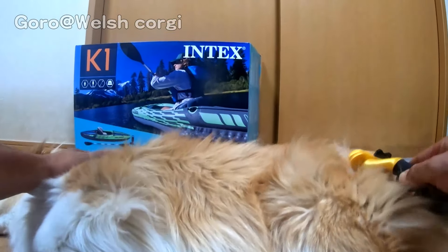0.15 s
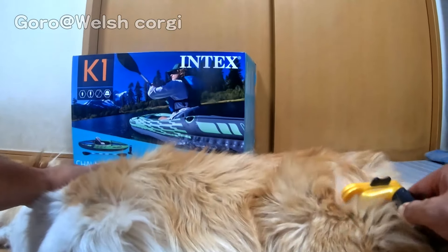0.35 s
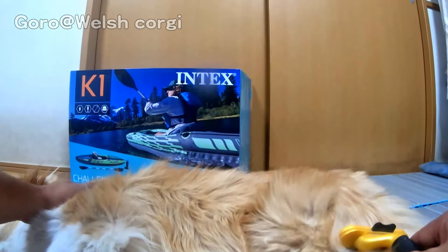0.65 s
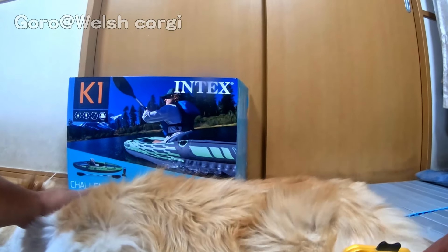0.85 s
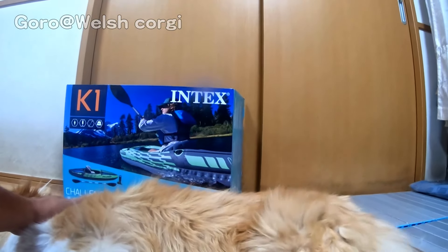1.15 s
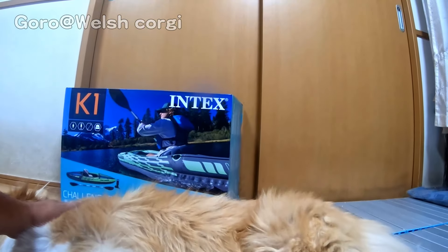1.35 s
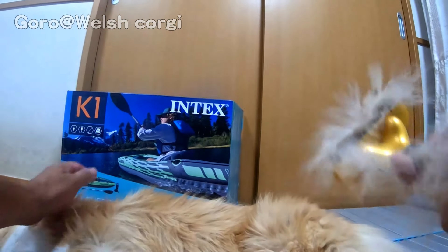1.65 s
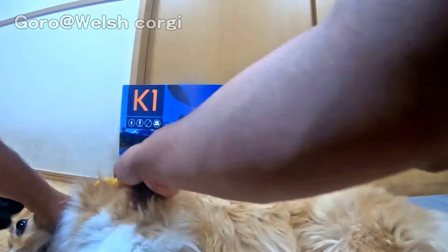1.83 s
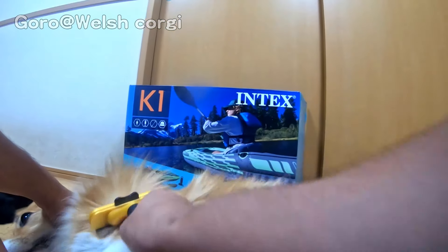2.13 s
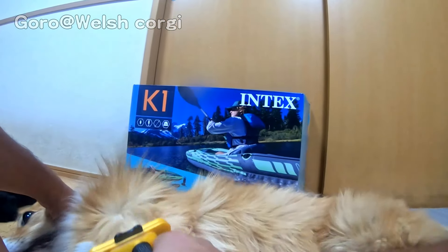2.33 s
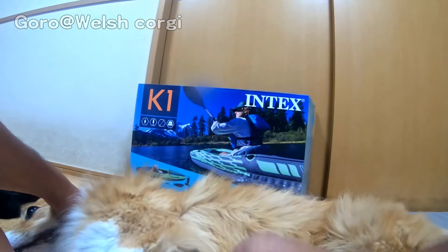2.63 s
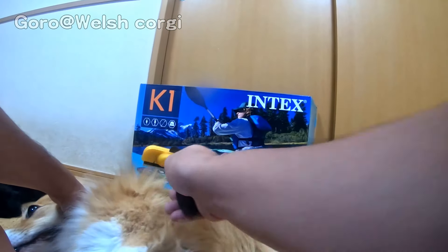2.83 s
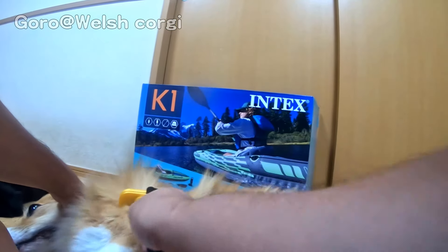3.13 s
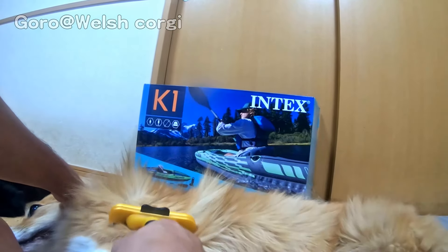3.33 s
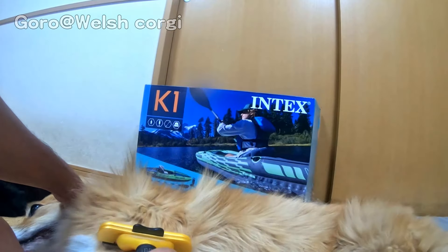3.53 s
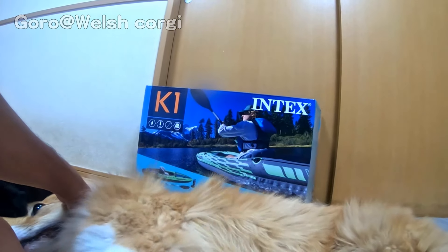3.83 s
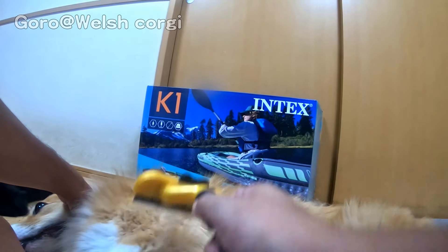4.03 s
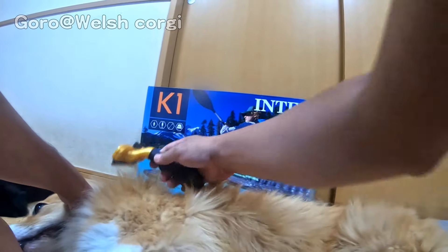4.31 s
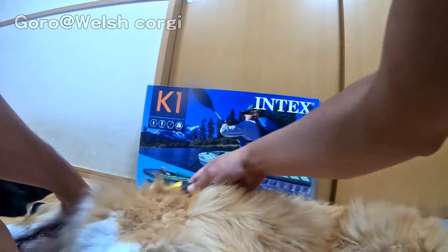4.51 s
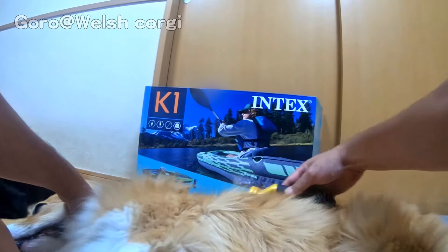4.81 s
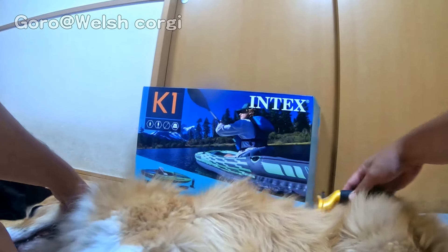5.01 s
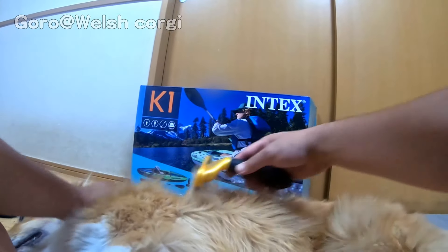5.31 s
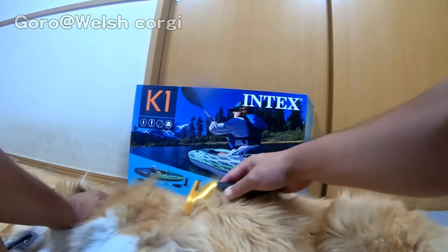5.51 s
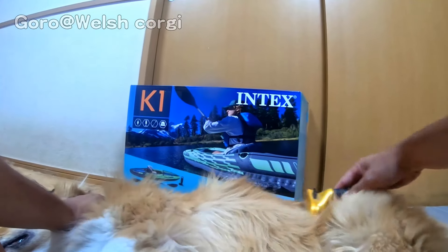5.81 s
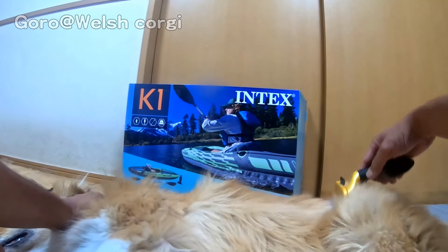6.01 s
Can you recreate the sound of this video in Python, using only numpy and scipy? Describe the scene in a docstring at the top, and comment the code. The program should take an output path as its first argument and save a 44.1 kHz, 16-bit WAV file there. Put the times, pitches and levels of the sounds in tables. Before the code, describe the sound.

In a quiet room, a rake is pulled through a dog's dense fur in short, uneven scratchy strokes. A camera worn by the groomer picks up the handling very closely: dull booms, hollow clacks and soft low thumps. One louder clattering knock comes just before two seconds, then the strokes continue and thin out toward the end over faint hiss.

```python
"""Scratching comes first: a deshedding rake is pulled through a dog's thick coat in a quiet room, close
to a camera worn by the groomer. Stick-slip friction rings short resonances of the camera and its mount.
Knocks boom and clack in the same resonances, snaps ring the housing, and firm rubs add a dull rumble.
Jolts thump the microphone ports as single slow swings; band-passed noise makes the faint swish of fur.
Behind lie shaped noise and a trace of mains hum."""
import sys
import numpy as np
from scipy import signal
from scipy.fft import rfft, irfft
from scipy.io import wavfile
from scipy.ndimage import uniform_filter1d

SR = 44100
rng = np.random.default_rng(int(sys.argv[2]) if len(sys.argv) > 2 else 0)


def output_pcm(signal):
    """Save a mono or channel-first signal as 16-bit PCM at the path in sys.argv[1].

    Samples are clipped to [-1, 1] before scaling.
    """
    pcm = np.clip(np.atleast_2d(signal).T, -1, 1) * 32767
    wavfile.write(sys.argv[1], SR, np.round(pcm).astype(np.int16))


N = 271596
TIME_S = np.arange(N) / SR
TOP_HZ = 11950

# Table levels are before the trims (*_trim_db) in the functions.
# Quiet background: (frequency [Hz], density [dB per Hz], left-right correlation [-1..1])
FLOOR = [(29.8, -90, 0.57), (58.7, -103, 0.94), (104.6, -99, -1), (164.5, -80, -0.2), (355, -96, -0.73),
         (565, -95.5, -0.95), (758, -87, -0.77), (1107, -102, -0.87), (2020, -105, -0.18),
         (2740, -112, 0.54), (7300, -111, -0.11), (8500, -120, 0.16), (11600, -125, -0.07)]
# Resonances: (frequency [Hz], width [Hz], relative level [dB], left minus right [dB], left phase lead [rad])
MOUNT_MODES = [(171.6, 38, -1.5, 4, -2.5), (213.3, 32.7, 1, 2, 2), (292, 80, -4.5, 11, 3)]
SHELL_MODES = [(418.5, 64, 2, 0.5, -3), (576.7, 54, -4.5, -3.5, -3.0), (649, 56, 3, -5.5, -2),
               (782.5, 67, -1.5, -3, -2), (980, 37, -16.5, -4, 3)]
PORT_MODES = [(1299, 160, -5.5, 0.5, 2), (1468, 120, -2.5, -2.5, 3), (1787, 183, -1, 4, 1.36),
              (2017, 270, -4, 2, 0.08)]
HOUSING_MODES = [(2930, 680, 5.5, 2.4, 1.03), (3400, 270, 4.5, -1.3, 0.64), (3770, 184, 4.5, -0.56, 0.24),
                 (5000, 330, 3, -0.41, 2.93), (6000, 1000, -1.5, 0.29, 1.65)]
# Fur sliding under hand and rake: (middle [s], length [s], level [dB])
SWISHES = [(1.108, 0.31, -65), (2.426, 0.21, -65.5), (3.65, 0.54, -69.5), (5.76, 0.14, -68.5)]
# Jolts that push air into the ports: (middle [s], level [dB], left minus right [dB])
JOLTS = [(0.045, -48.5, -16), (0.542, -31.5, -11), (0.575, -33, -6), (0.593, -28.5, -11), (1.912, -29, -5),
         (2.385, -38.5, -9), (2.907, -39, -6), (3.028, -40.5, -7), (3.583, -40, -13), (3.886, -36.5, -4),
         (4.434, -31.5, -10), (4.479, -36, -7)]
# Sharp snaps as a catch lets go: (time [s], level [dB])
SNAPS = [(1.886, -54.5), (2.2, -55.5), (2.284, -69), (2.315, -73), (2.935, -45), (4.591, -68.5),
         (5.465, -62)]
# Knocks on the mount: (time [s], mount boom [dB], shell clack [dB], contact tick [dB])
KNOCKS = [(0.117, -35.5, -39, -61.5), (0.209, -46.5, -48, -75), (0.281, -35.5, -40, -58.5),
          (0.306, -46, -44, -58.5), (0.514, -51, -46, -61), (0.637, -59, -42, -56), (0.697, -39, -54, -75),
          (1.129, -40, -49, -64), (1.169, -40.5, -50, -78), (1.311, -43, -60, -78),
          (1.397, -49, -39.5, -63), (1.477, -37.5, -53, -67), (1.545, -54, -44.5, -63),
          (1.66, -56, -48.5, -86), (1.884, -39.5, -27, -44.5), (1.902, -43, -29, -65),
          (1.906, -28.5, -35, -54.5), (2.111, -60, -49, -63), (2.199, -43, -39, -54),
          (2.28, -49, -39.5, -63), (2.377, -46, -50.5, -61), (2.515, -39.5, -50, -70),
          (2.621, -45.5, -49.5, -81), (2.848, -44, -56, -71), (2.934, -37, -35, -43.5),
          (3.321, -48, -41.5, -54.5), (3.536, -41, -47, -63), (3.563, -36, -45, -64.5),
          (3.875, -40.5, -45, -56), (4.116, -34, -40, -51), (4.361, -57, -63, -58.5),
          (4.421, -38, -58, -68), (5.095, -67, -53, -75), (5.271, -70, -47, -77),
          (5.464, -44.5, -40, -53.5), (5.712, -50, -49, -74)]
# Light rustle of the hand resting in the coat: (time [s], drag level [dB])
RESTING_HAND = [(0, -53), (.55, -54.5), (.78, -64.5), (1.4, -60), (1.85, -57.5), (2.1, -60), (2.75, -61),
                (3.45, -59), (3.9, -58), (4.3, -67.5), (4.9, -67), (5.02, -66.5), (5.55, -58.5), (5.9, -76),
                (6.15, -63)]
RESTING_SCRATCH_DB = -13  # relative to its drag
# Rubs of rake, hand and arm: (start [s], length [s], drag level [dB], scratch level [dB])
RUBS = [(0.004, 0.094, -47.5, -62), (0.276, 0.074, -48.5, -58.5), (0.386, 0.055, -50, -61.5),
        (0.5, 0.16, -47.5, -60.5), (0.558, 0.1, -44, -58), (0.827, 0.051, -58, -67.5),
        (1.046, 0.038, -57.5, -66.5), (1.119, 0.098, -47.5, -61), (1.19, 0.24, -52.5, -70),
        (1.538, 0.032, -50, -70), (1.672, 0.13, -53.5, -69.5), (1.862, 0.059, -43.5, -56),
        (2.083, 0.12, -54, -62), (2.203, 0.097, -45.5, -55), (2.26, 0.1, -46, -56.5),
        (2.445, 0.085, -50.5, -64), (2.858, 0.14, -44.5, -57), (2.937, 0.085, -43, -51.5),
        (3.017, 0.072, -47, -66), (3.192, 0.1, -62.5, -70.5), (3.297, 0.058, -44.5, -59),
        (3.565, 0.077, -47.5, -78), (3.835, 0.076, -44.5, -60.5), (3.934, 0.049, -52.5, -63.5),
        (4.053, 0.042, -46.5, -67.5), (4.338, 0.1, -50, -66.5), (4.402, 0.061, -48, -55),
        (4.426, 0.051, -46.5, -51.5), (4.568, 0.049, -61.5, -66.5), (4.683, 0.052, -60.5, -76),
        (5.074, 0.081, -55, -66.5), (5.439, 0.048, -45, -68), (5.703, 0.061, -52, -64.5)]
RUB_ATTACK_S, RUB_RELEASE_S, RUB_EASE_DB = 0.011, 0.022, 6.5  # ease: softening at both ends


def undb(db):
    """Amplitude ratio of a level in dB."""
    return 10 ** (np.asarray(db) / 20)


def unit(x):
    """Scale to rms 1."""
    return x / np.sqrt(np.mean(x ** 2))


def pan(db):
    """Left and right gains of unit mean power; db is left minus right."""
    return unit(undb(np.array([[db], [-db]]) / 2))


def band(x, lo_hz, hi_hz, order=2):
    """Butterworth band-pass."""
    sos = signal.butter(order, [lo_hz, min(hi_hz, .45 * SR)], "band", fs=SR, output="sos")
    return signal.sosfilt(sos, x)


def walk(rate_hz):
    """Random levels, each 1 / rate_hz long, slewed into each other; rms 1."""
    hold = int(SR / rate_hz)
    steps = np.repeat(rng.standard_normal(N // hold + 1), hold)
    return unit(uniform_filter1d(steps, hold)[:N])


def add(out, start_s, sound):
    """Mix a stereo sound in at start_s."""
    i = max(int(start_s * SR), 0)
    out[:, i:i + sound.shape[1]] += sound[:, :N - i]


def mode_rings(modes, stretch=1, rise_cycles=0.42, size=4096):
    """Stereo response of each damped mode to one push; most move the microphones against each other."""
    t, rings = np.arange(size) / SR, []
    for k, (hz, width_hz, db, pan_db, lead_rad) in enumerate(modes):
        fade = np.exp(-np.pi * width_hz * t) * (1 - np.exp(-t * hz / rise_cycles))
        wave = np.sin(2 * np.pi * hz * stretch * t + np.array([[lead_rad], [0]]))
        polarity = (-1) ** k
        rings.append(polarity * undb(db) * pan(pan_db) * unit(fade * wave))
    return rings


def ring(modes, chance, detune=0.008, scatter_db=2):
    """One blow on a random spot: it favours some modes and bends their pitch a little."""
    chance = np.clip(chance, -2, 2)
    rings = mode_rings(modes, np.exp(detune * chance[0]))
    return sum(undb(scatter_db * c) * r for c, r in zip(chance[1:], rings))


def slips(rate_hz, spread_db):
    """Stick-slip: tiny releases at random moments, a few much larger than the rest."""
    sizes = undb(spread_db * np.minimum(rng.standard_exponential(N), 4)) * rng.choice([-1, 1], N)
    return unit(sizes * (rng.random(N) < rate_hz / SR))


def background(waver_db=-0.2, floor_trim_db=-1, hum_hz=60, hum_db=-75):
    """Faint rumble that wavers very slightly, steady hiss above it and a trace of mains hum."""
    hz, db, correlation = np.transpose(FLOOR)
    f_hz = np.maximum(np.arange(N // 2 + 1) * SR / N, 1)
    gain = undb(np.interp(np.log(f_hz), np.log(hz), db) + floor_trim_db) * np.sqrt(SR / 4)
    alike = np.clip(np.interp(np.log(f_hz), np.log(hz), correlation), -1, 1)
    # mid and side powers set the left-right correlation
    mid = irfft(rfft(rng.standard_normal(N)) * gain * np.sqrt(1 + alike), N)
    side = irfft(rfft(rng.standard_normal(N)) * gain * np.sqrt(1 - alike), N)
    noise = np.array([mid + side, mid - side])
    low_noise = irfft(rfft(noise) / (1 + (f_hz / 1500) ** 4), N)
    waver = low_noise * (undb(waver_db * walk(28)) - 1)
    hum = undb(hum_db) * pan(-7.0) * unit(np.sin(2 * np.pi * hum_hz * TIME_S))
    return noise + waver + hum


def fur(lo_hz=5000, hi_hz=6900, trim_db=-8.0):
    """Countless hairs slide past each other: a thin swish that swells and fades."""
    swell = sum(undb(db) * np.exp(-2 * ((TIME_S - middle_s) / length_s) ** 2)
                for middle_s, length_s, db in SWISHES)
    return undb(trim_db) * swell * unit(band(rng.standard_normal((2, N)), lo_hz, hi_hz, order=3))


def jolts(centre_hz=73, sigma_s=0.0068, trim_db=3):
    """A jolt is about one slow swing of pressure, reaching the two ports at different phases."""
    out, t = np.zeros((2, N)), TIME_S[:4096] - TIME_S[2048]
    port_lag_rad = np.array([[1.5], [0]])
    for middle_s, db, pan_db in JOLTS:
        hz = centre_hz * np.exp(0.16 * rng.standard_normal())
        swing = np.cos(2 * np.pi * hz * t - port_lag_rad)
        envelope = np.exp(-(t / sigma_s) ** 2 / 2)
        add(out, middle_s + t[0], undb(db + trim_db) * pan(pan_db) * swing * envelope)
    return out


def snaps(rebound_s=0.002, rebound_db=-4, trim_db=-8):
    """A snap is one clean push on the housing and a rebound just after: a very short, bright ring."""
    out = np.zeros((2, N))
    for start_s, db in SNAPS:
        for delay_s, softer_db in ((0, 0), (rebound_s, rebound_db)):
            sound = unit(band(ring(HOUSING_MODES, rng.standard_normal(8)), 2930, 4900))
            add(out, start_s + delay_s, undb(db + softer_db + trim_db) * sound)
    return out


def knocks(boom_trim_db=-1.5, clack_trim_db=1, tick_trim_db=0, housing_trim_db=-13,
           crunch_s=0.00082, crunch=0.27, tail_s=0.037, tail_db=-18):
    """A knock booms in the mount and clacks in the shell; its contact crunches briefly and scrapes off."""
    out = np.zeros((2, N))
    blow = int(.02 * SR)  # each part is levelled over its first 20 ms
    for start_s, boom_db, clack_db, tick_db in KNOCKS:
        chance = rng.standard_normal((5, 4096))
        t = TIME_S[:4096]
        grit = np.exp(-t / crunch_s) + undb(tail_db) * np.exp(-t / tail_s)
        force = (t == 0) + crunch * chance[4] * grit
        mount, shell = ring(MOUNT_MODES, chance[0]), ring(SHELL_MODES, chance[1])
        ports = signal.fftconvolve(ring(PORT_MODES, chance[2]), force[None], axes=1)
        housing = signal.fftconvolve(ring(HOUSING_MODES, chance[3]), force[None], axes=1)
        parts = [(mount, 110, 430, boom_db + boom_trim_db),
                 (shell, 310, 610, clack_db + clack_trim_db),
                 (ports, 660, 2700, tick_db + tick_trim_db),
                 (housing, 1900, 7700, tick_db + housing_trim_db)]
        for rings, lo_hz, hi_hz, db in parts:
            sound = band(rings, lo_hz, hi_hz, order=1)
            add(out, start_s, undb(db) * sound / np.sqrt(np.mean(sound[:, :blow] ** 2)))
    return out


def rub_envelope(start_s, length_s):
    """Quick attack, a hold that arches with the pressure of the hand, exponential release."""
    t = TIME_S - start_s
    attack = np.clip(t / RUB_ATTACK_S, 0, 1)
    arch = undb(-RUB_EASE_DB * (2 * np.clip(t / length_s, 0, 1) - 1) ** 2)
    return attack * arch * np.exp(-np.maximum(t - length_s, 0) / RUB_RELEASE_S)


def friction_levels():
    """Drag and scratch in dB: the powers of all rubs and of the resting hand add up."""
    resting_db = np.interp(TIME_S, *np.transpose(RESTING_HAND))
    drag_power = undb(resting_db) ** 2
    scratch_power = undb(resting_db + RESTING_SCRATCH_DB) ** 2
    for start_s, length_s, drag_db, scratch_db in RUBS:
        envelope = rub_envelope(start_s, length_s)
        drag_power += (undb(drag_db) * envelope) ** 2
        scratch_power += (undb(scratch_db) * envelope) ** 2
    return 10 * np.log10(drag_power), 10 * np.log10(scratch_power)


def rumble(low_db=-10, sway_db=-11, steepness=1.9, firm_db=-45):
    """A firm rub also sways the whole camera: a dull rumble that grows faster than the drag."""
    drag_db, _ = friction_levels()
    gain = undb(firm_db + steepness * (drag_db - firm_db))
    low = undb(low_db) * pan(-7) * unit(band(rng.standard_normal(N), 29, 75))
    sway = undb(sway_db) * unit(band(slips(rate_hz=200, spread_db=4.5), 156.6, 236.25))
    return gain * (low + sway)


def tugs(rate_hz=120, decay_s=0.0024, depth=1.05):
    """Tufts catch and tear free one by one: each tug briefly swells the friction."""
    starts = (rng.random(N) < rate_hz / SR) * rng.random(N)
    return 1 + depth * signal.lfilter([1], [1, -np.exp(-1 / (decay_s * SR))], starts)


def brightness(scratch_db, share_db=-9.0, hardening_db_per_db=0.056, usual_db=-60):
    """The harder the contact, the more of it goes into the high ring of the housing."""
    return undb(share_db + hardening_db_per_db * np.clip(scratch_db - usual_db, -8, 16))


def rubbing(mount_trim_db=-3, shell_trim_db=0, scratch_trim_db=1, loose_db=-6, patchy_db=2, wander_db=1.61):
    """Slips ring mount and shell at the drag level, ports and housing at the finer scratch level."""
    grip_db, tug = patchy_db * walk(60), tugs()
    drag_db, scratch_db = (db + grip_db for db in friction_levels())
    coarse, fine = slips(rate_hz=1100, spread_db=1.67), slips(rate_hz=1000, spread_db=1.5)
    scratch_gain = undb(scratch_db + scratch_trim_db)
    layers = [(MOUNT_MODES, coarse, undb(drag_db + mount_trim_db), 90, 700),
              (SHELL_MODES, coarse, undb(drag_db + shell_trim_db), 280, 1200),
              (PORT_MODES, coarse + fine, scratch_gain, 850, 3500),
              (HOUSING_MODES, coarse + fine, scratch_gain * brightness(scratch_db), 2000, 8500)]
    out = np.zeros((2, N))
    for modes, push, gain, lo_hz, hi_hz in layers:
        # part of the friction reaches each microphone on its own
        force = tug * (unit(push) + undb(loose_db) * rng.standard_normal((2, N)))
        sound = np.zeros((2, N))
        for response in mode_rings(modes):
            # as the contact travels it favours now one mode, now another
            favour = undb(wander_db * walk(11))
            sound += favour * signal.oaconvolve(force, response, axes=1)[:, :N]
        out += gain * unit(band(sound, lo_hz, hi_hz))
    return out


def scene():
    """Sum of all layers, stereo."""
    return background() + fur() + jolts() + rumble() + snaps() + knocks() + rubbing()


def record(dry):
    """The camera cuts the top: steep elliptic low-pass."""
    return signal.sosfilt(signal.ellip(10, .2, 70, TOP_HZ, fs=SR, output="sos"), dry)


dry = scene()
out = record(dry)
output_pcm(out)
```